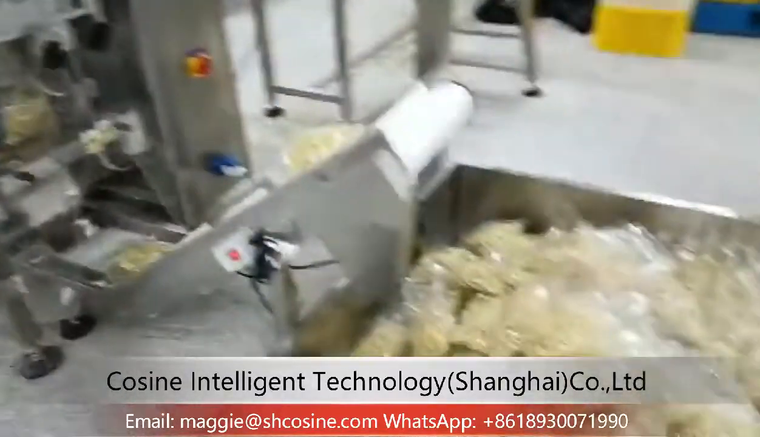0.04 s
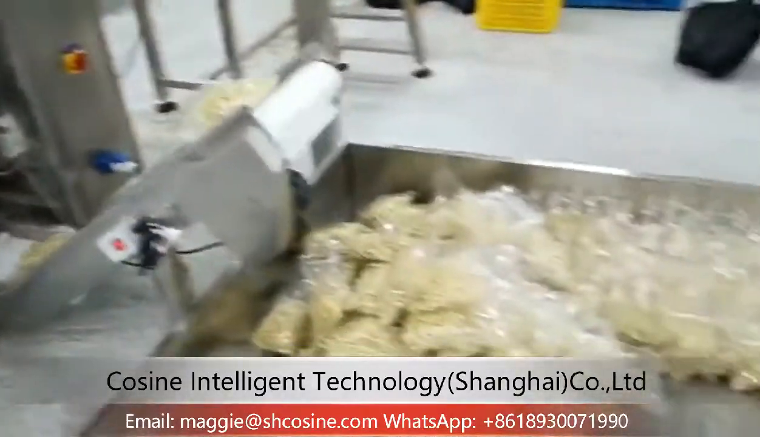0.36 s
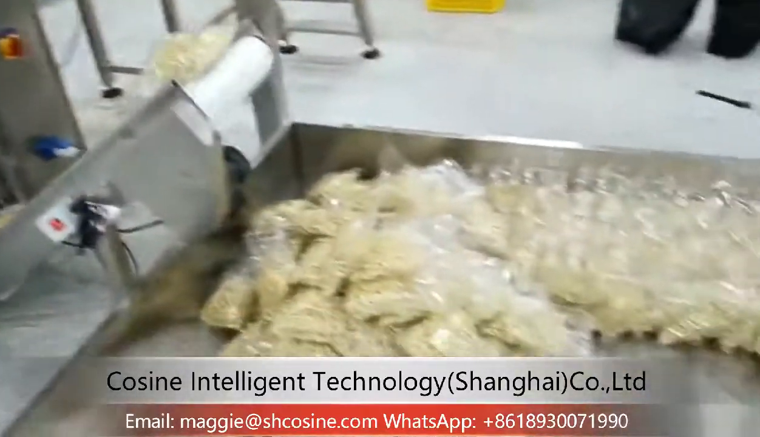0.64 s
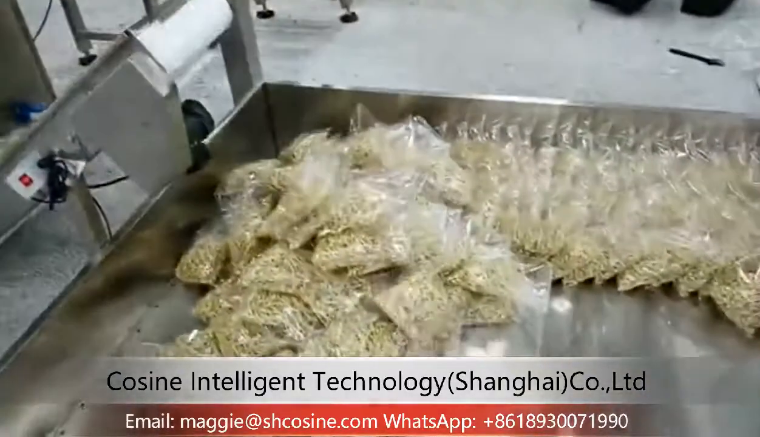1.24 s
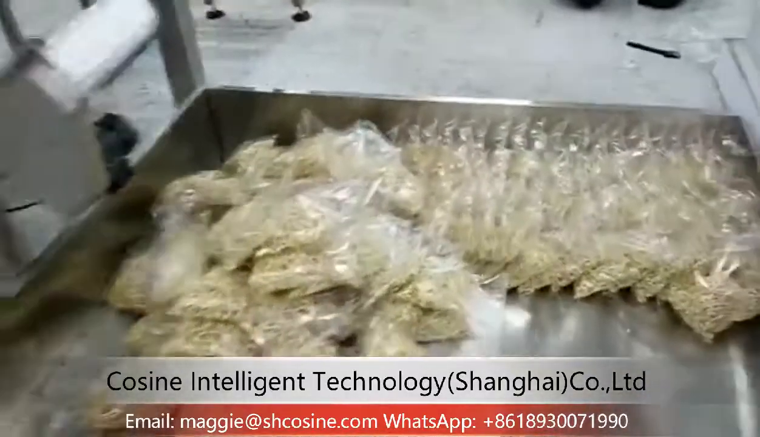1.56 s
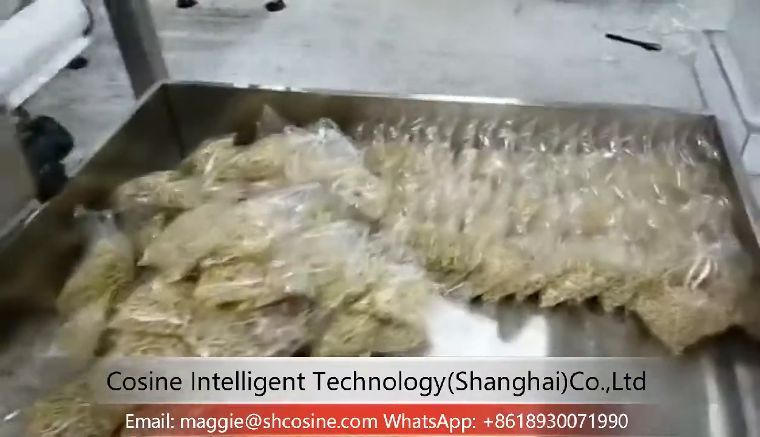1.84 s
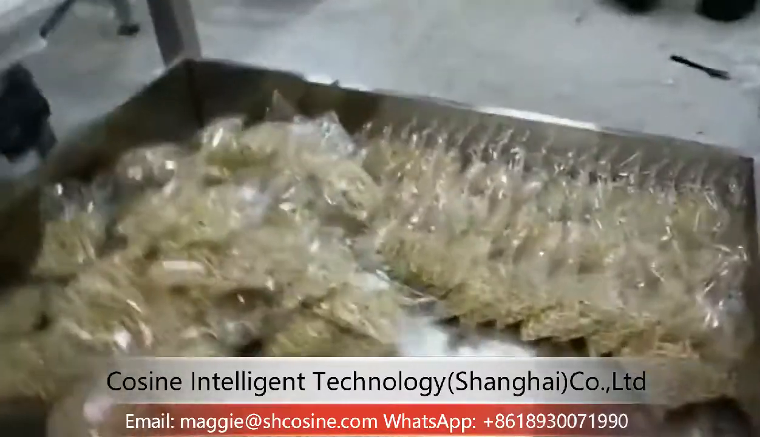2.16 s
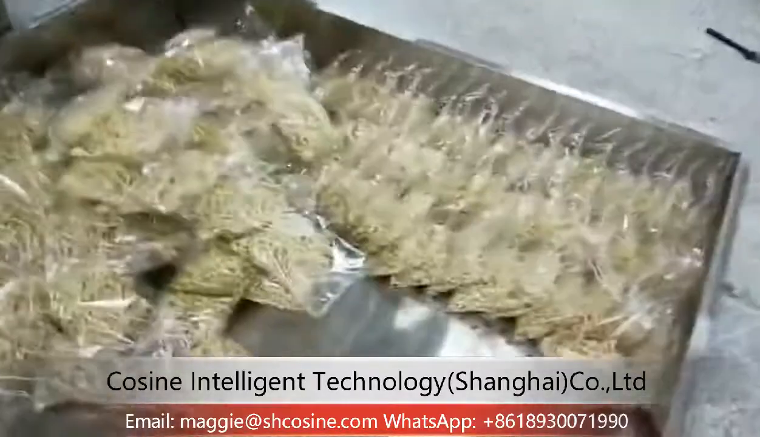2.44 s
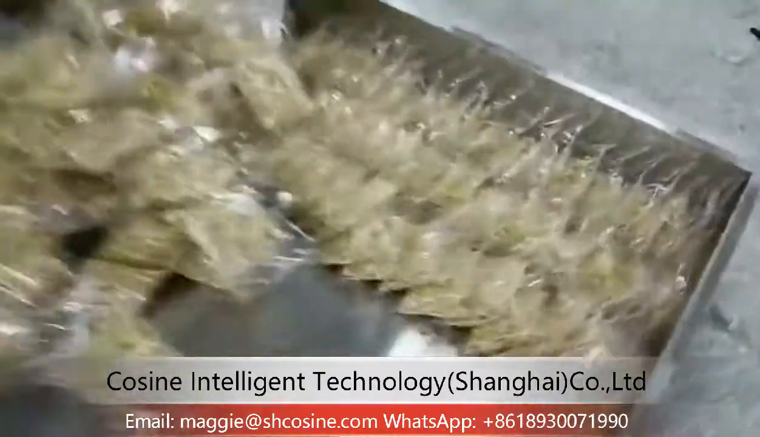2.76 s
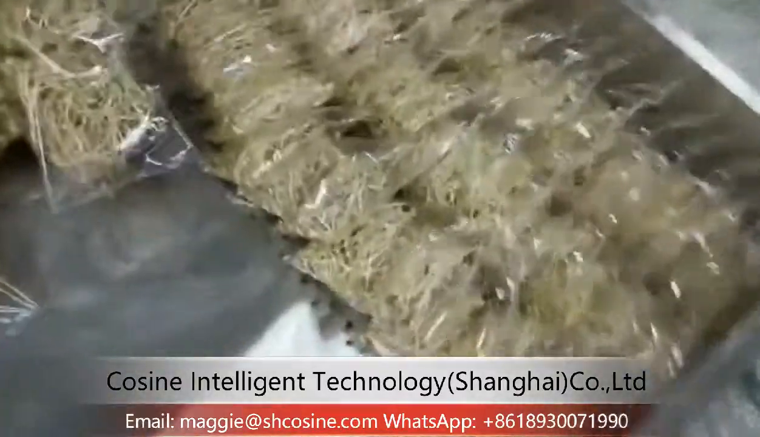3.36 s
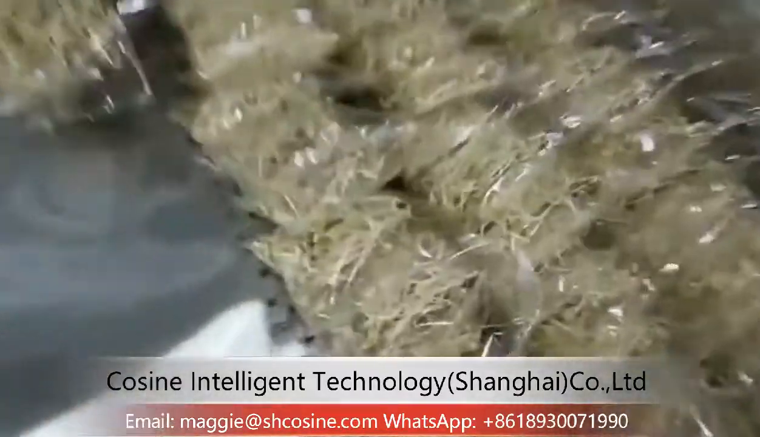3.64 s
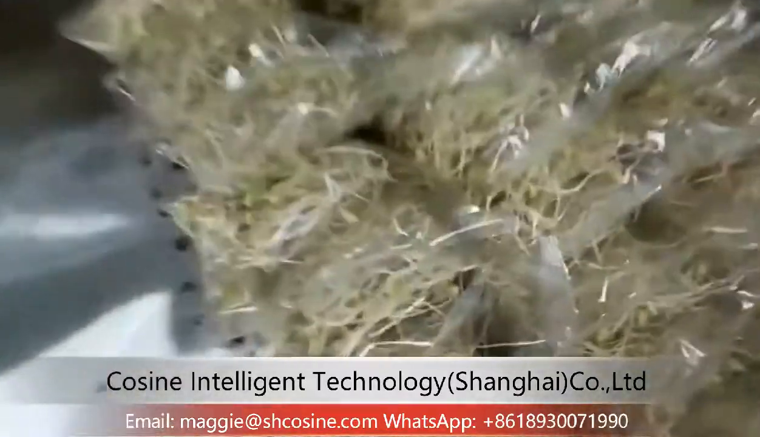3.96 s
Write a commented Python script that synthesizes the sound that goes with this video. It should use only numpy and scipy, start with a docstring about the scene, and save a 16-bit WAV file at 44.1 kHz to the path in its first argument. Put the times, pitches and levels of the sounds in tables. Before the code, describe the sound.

Over the steady din of a factory hall, a nearby packing machine thumps, then rustles, hisses and rattles with squeaking steel. It eases off, thumps into a second rattling rush, and a bag briefly swishes over steel.

```python
"""The steady din of a hard-walled factory hall and a thin drive whine, then a dull thump: a bag-packing
machine starts its cycle, and again about 2.4 s later. Each cycle swells into a rush of rustling film and
rattling steel while the frame rumbles under load. Loose sheets knock, air and film hiss, steel parts
squeak, squeal, scrape and clack, the drive hums briefly, and near the end a bag swishes over steel."""
import sys
import numpy as np
from scipy import signal
from scipy.fft import rfft, irfft
from scipy.io import wavfile

SR = 44100
rng = np.random.default_rng(int(sys.argv[2]) if len(sys.argv) > 2 else 0)


def wav_out(sig):
    """Save sig, one row per channel (or a flat mono array), as 16-bit PCM at SR to the path in sys.argv[1]."""
    wavfile.write(sys.argv[1], SR, np.round(np.clip(np.atleast_2d(sig).T, -1, 1) * 32767).astype(np.int16))


N = 176400
T = np.arange(N) / SR
ECHO_T = T[:SR // 10]
HZ = np.maximum(np.fft.rfftfreq(N, 1 / SR), 1)

# tone of the hall's din (frequency [Hz], relative level [dB])
DIN_EQ = [(25, -33.5), (80, -13), (160, 0.5), (340, -0.5), (700, -1.5), (1100, -8), (1550, -3.5),
          (2000, -1), (2900, 0.5), (3900, -5), (4800, -15.5), (5700, -9), (6300, -9.5), (6800, -7.5),
          (7500, -21.5)]
# the drive's hums (time [s], hold [s], pitch [Hz], level [dB])
DRIVE_HUMS = [(.41, 0.073, 332.5, -30.5), (2.313, 0.22, 344, -36.5), (2.356, 0.034, 344, -31),
              (2.94, .06, 420, -31.5), (3.552, 0.068, 405, -30)]
# swell of the drive's whine (time [s], level [dB])
WHINE_FADER = [(.07, -40), (.13, -31), (1.1, -38.5), (1.8, -38), (2.05, -45.5), (2.42, -39), (3.0, -35.5),
               (4, -46)]
# resonances of the whine (frequency [Hz], width [Hz], relative level [dB])
WHINE_RING = [(6256, 12, 0), (6380, 130, -4)]
# swells of the frame's rumble and deep shudder (time [s], relative level [dB])
RUMBLE_FADER = [(0.0, -38.5), (0.24, -35.5), (0.47, -29), (1.06, -33.5), (1.19, -28.5), (1.44, -38),
                (2.29, -46.5), (2.37, -35.5), (2.77, -33.5), (2.91, -28.5), (3.09, -29.5), (3.15, -25),
                (3.46, -35.5), (3.65, -31.5), (4.0, -39.5)]
SHUDDER_FADER = [(0, -49), (.3, -37), (.39, -27), (.78, -30), (.88, -39.5), (1.08, -29.5), (1.3, -32.5),
                 (1.5, -43.5), (2.3, -51), (2.5, -39), (2.74, -40), (2.8, -24.5), (3.05, -33.5),
                 (3.22, -24), (3.32, -35), (4, -39)]
# tone of the rumble and shudder (frequency [Hz], relative level [dB])
RUMBLE_EQ = [(120, -15), (260, -6.5), (340, -2), (430, -0.5), (540, 0), (720, -0.5), (900, -4),
             (1100, -11.5), (1800, -26)]
SHUDDER_EQ = [(20, -20), (40, -33.5), (70, -5), (95, -8.5), (130, -0.5), (165, -1), (200, 1.5), (260, -6.5),
              (400, -27)]
# knocks on loose steel sheets (time [s], relative level [dB])
SHEET_KNOCKS = [(.47, -29.5), (.55, -32), (.65, -32), (.76, -28.5), (2.87, -32), (3.16, -31), (3.21, -32.5)]
# modes of the sheets (frequency [Hz], relative level [dB])
SHEET_RING = [(340, -6), (402, -4.5), (615, -5.5), (692, -1.5), (850, -7.5), (1310, -2.5), (1455, -4.5)]
# thin squeals (time [s], hold [s], pitch [Hz], level [dB])
SQUEAL_CUES = [(.365, 0.059, 5860, -29), (.47, 0.12, 5860, -27.5), (0.707, 0.099, 5880, -31.5),
               (0.926, .06, 5800, -27), (1.081, 0.2, 5850, -31.5), (3.804, 0.023, 1379, -27)]
# scrapes, clacks and the bag's swish on steel (time [s], hold [s], level [dB])
SCRAPE_CUES = [(0.466, 0.21, -31), (0.934, 0.13, -19.5), (1.039, 0.038, -26.5), (1.117, 0.28, -33)]
CLACK_CUES = [(1.238, .027, -22), (3.114, .01, -15.5)]
SWISH_CUES = [(3.685, 0.05, -21)]
# the resonances each one excites (frequency [Hz], width [Hz], relative level [dB])
SCRAPE_RING = [(3875, 25, -9), (4812, 22, -11), (5880, 90, -3), (6340, 90, -1), (6700, 80, -4),
               (6957, 28, -2)]
CLACK_RING = [(3980, 260, -1), (4650, 250, -5), (5010, 150, -9.5), (5750, 250, -5)]
SWISH_RING = [(1660, 110, -6), (2084, 140, -0.5), (2600, 90, -8), (3040, 130, -4), (3930, 150, -2),
              (5300, 190, -3)]
# chattering squeaks (time [s], relative level [dB])
SQUEAK_CUES = [(.52, -17.5), (.592, -17.5), (0.704, -16), (0.75, -19), (.79, -18), (0.849, -21.5),
               (0.894, -20.5), (1.04, -20.5)]
# bursts of air and film (time [s], hold [s], level [dB])
HISS_CUES = [(.585, .056, -23.5), (.747, .038, -18), (0.939, .09, -24.5), (1.367, 0.033, -23.5),
             (1.746, .011, -28), (3.15, 0.035, -22)]
# tone of those bursts (frequency [Hz], relative level [dB])
HISS_EQ = [(500, -14.5), (1200, -5), (2200, 0), (3300, -3.5), (3950, 4), (4600, -8.5), (5400, -1),
           (6200, -3), (7400, -20)]
# the machine's dull blows (time [s], envelope peak [dB])
THUMP_CUES = [(0.3527, -6.5), (0.937, -29), (1.259, -20), (2.7636, -9.5), (3.133, -22), (3.478, -20),
              (3.672, -23.5)]
# swells of the rustling rush and its bright crinkle (time [s], relative level [dB])
RUSH_FADER = [(0.0, -32.5), (0.57, -19), (0.68, -21.5), (0.72, -22), (0.95, -23.5), (1.15, -20),
              (1.32, -25), (2.16, -37.5), (2.58, -31.5), (2.61, -26.5), (2.72, -29.5), (2.9, -23),
              (3.12, -23.5), (3.17, -21), (3.31, -27), (3.72, -25.5), (4.0, -31)]
CRINKLE_FADER = [(0.0, -52), (.33, -37.5), (0.56, -27.5), (0.69, -22.5), (0.76, -21), (0.92, -24.5),
                 (0.95, -22.5), (1.28, -27), (1.75, -36), (2.0, -48.5), (2.73, -41), (3.16, -21),
                 (3.33, -30.5), (3.7, -30.5), (4.0, -39)]
# tone of the rush and crinkle (frequency [Hz], relative level [dB])
RUSH_EQ = [(700, -38), (1100, -11), (1450, -7), (2450, -2), (3050, -0.5), (3450, -5), (3950, -12.5),
           (4500, -14.5), (6000, -23.5), (7500, -54.5)]
CRINKLE_EQ = [(2500, -17), (3600, -2.5), (4400, -2), (5000, 2), (5500, 6.5), (5900, 9), (6350, 5.5),
              (6750, 0), (7400, -42)]
# how alike the two sides are (frequency [Hz], likeness [0 is wide, 1 and above is mono])
STEREO_LIKENESS = [(60, 2), (130, 3.87), (250, 1), (470, 0.8), (930, 0.15), (1400, 0.1865), (2300, 0.16),
                   (6000, 0.03)]
# balance of the microphones (frequency [Hz], left minus right [dB])
MIC_BALANCE = [(300, 0), (800, -.5), (1450, -1.5), (2000, -5), (2600, -8), (3150, -11), (3800, -3.5),
               (4400, -2), (5100, 1.5), (5700, -2), (6300, -11), (7000, 1)]
# lag of the right microphone (frequency [Hz], phase [rad])
RIGHT_LAG = [(0, 0), (700, .05), (1380, 3), (1890, 3.6), (2410, 6.2), (5600, 17), (7490, 26)]


def from_db(db):
    """Decibels to gain."""
    return 10 ** (np.asarray(db) / 20)


def rms_one(x):
    """Scale to rms 1."""
    return x / np.sqrt(np.mean(x ** 2) + 1e-20)


def fader(points, trim_db=0):
    """Gain at every sample, riding a level curve."""
    return from_db(np.interp(T, *np.transpose(points)) + trim_db)


def over_hz(points):
    """A spectrum table at every frequency."""
    hz, value = np.transpose(points)
    return np.interp(np.log(HZ), np.log(hz), value)


def drift(rate_hz):
    """Smooth random wobble with a spread of about 1."""
    count = N // 20
    hz = np.fft.rfftfreq(count, N / SR / count)
    slow = irfft(rfft(rng.standard_normal(count)) / (1 + (hz / rate_hz) ** 2) * (hz > 2), count)
    return np.interp(T, np.linspace(0, N / SR, count), np.clip(rms_one(slow), -2, 2))


def spread(gain, source):
    """Colour two unrelated signals and blend them as mid and side into a stereo pair of rms 1."""
    mid, side = rfft(source) * gain
    alike = np.clip(over_hz(STEREO_LIKENESS), -.999, .999)
    return rms_one(irfft(np.sqrt(1 + alike) * mid + np.sqrt(1 - alike) * side * [[1], [-1]], N))


def noise_bed(eq, flicker_db, rate_hz, source=None):
    """Coloured stereo noise whose level flickers."""
    source = rng.standard_normal((2, N)) if source is None else source
    return spread(from_db(over_hz(eq)), source) * from_db(flicker_db * drift(rate_hz))


def ringing(modes):
    """Resonances kept ringing by rough contact; stereo, rms 1."""
    gain = sum(from_db(db) / (1 + ((HZ - hz) / width) ** 2) / np.sqrt(width) for hz, width, db in modes)
    return spread(gain, rng.standard_normal((2, N)))


def tone(hz, waver_hz):
    """A sine of rms 1 whose pitch wavers."""
    return np.sqrt(2) * np.sin(2 * np.pi * np.cumsum(hz + waver_hz * drift(36.7)) / SR)


def envelope(start, hold, db, attack_s, decay_s):
    """Rise to a level, stay until the hold ends, die away."""
    rise = np.clip((T - start) / attack_s, 0, 1)
    return from_db(db) * rise * np.exp(-np.maximum(T - start - hold, 0) / decay_s)


def bursts(cues, attack_s, decay_s):
    """One envelope for each cue, summed."""
    return sum(envelope(*cue, attack_s, decay_s) for cue in cues)


def hall_reverb(x, t60_s=0.97, predelay_s=.012):
    """Diffuse tail of the hall, about as strong as the sound that feeds it."""
    tail = spread(1, rng.standard_normal((2, N))) * from_db(-60 * T / t60_s) * (T > predelay_s)
    return signal.fftconvolve(x[None], tail / np.sqrt(np.sum(tail[0] ** 2)), axes=1)[:, :N]


def reflections(x, fading):
    """Dense fading echoes; their pattern shifts seven times a second as parts and listener move."""
    hop = SR // 7
    padded = np.pad(x * np.ones((2, 1)), [(0, 0), (hop, 2 * hop)])
    out = np.zeros((2, N + SR))
    for i in range(0, N + hop, hop):
        pattern = rng.standard_normal((2, len(fading))) * fading / np.linalg.norm(fading)
        grain = padded[:, i:i + 2 * hop] * signal.windows.cosine(2 * hop)
        echoes = signal.fftconvolve(grain, pattern, axes=1)
        out[:, i:i + echoes.shape[1]] += echoes
    return out[:, hop:hop + N]


def panels(x, send=0.55, fade_s=0.0049, low_cut_hz=600):
    """Reflections off nearby steel panels comb the mids and treble."""
    echoes = reflections(x, np.exp(-ECHO_T / fade_s))
    return x + send * irfft(rfft(echoes) / (1 + (low_cut_hz / HZ) ** 2), N)


def hall_din():
    """The factory's broad, fluttering noise floor, bounced off the panels."""
    bounced = panels(rng.standard_normal((2, N)))
    return from_db(-33.5) * noise_bed(DIN_EQ, flicker_db=2.7, rate_hz=10, source=bounced)


def drive():
    """The drive gives brief low hums and a thin whine that swells and sinks."""
    hum = sum(envelope(start, hold, db, attack_s=.025, decay_s=.025) * tone(hz, waver_hz=6)
              for start, hold, hz, db in DRIVE_HUMS)
    return hum + fader(WHINE_FADER) * ringing(WHINE_RING)


def frame():
    """The frame rumbles and shudders under load."""
    rumble = fader(RUMBLE_FADER) * noise_bed(RUMBLE_EQ, flicker_db=2, rate_hz=12)
    shudder = fader(SHUDDER_FADER, trim_db=0.5) * noise_bed(SHUDDER_EQ, flicker_db=0.24, rate_hz=5.2)
    return rumble + shudder


def sheet_knocks(t60_s=.28):
    """Loose sheets knock; each knock rings every mode with a strength of its own."""
    blows = np.zeros((len(SHEET_RING), N))
    for start, db in SHEET_KNOCKS:
        blows[:, int(start * SR)] = from_db(db) * rng.standard_normal(len(blows))
    rings = np.array([from_db(db - 60 * T / t60_s) * np.sin(2 * np.pi * hz * T) for hz, db in SHEET_RING])
    direct = signal.fftconvolve(blows, rings, axes=1).sum(axis=0)[:N]
    return direct + from_db(-5) * hall_reverb(direct)


def squeals(width_hz=17):
    """Steel rubbing under load sings on one narrow resonance at a time."""
    return sum(ringing([(hz, width_hz, 0)]) * envelope(start, hold, db, attack_s=0.0092, decay_s=0.038)
               for start, hold, hz, db in SQUEAL_CUES)


def scrapes():
    """Scraped steel rings high and bright."""
    return ringing(SCRAPE_RING) * bursts(SCRAPE_CUES, attack_s=0.0078, decay_s=0.057)


def clacks():
    """Brief steel contacts excite broad resonances that die fast."""
    return ringing(CLACK_RING) * bursts(CLACK_CUES, attack_s=.004, decay_s=.012)


def bag_swish():
    """A bag slides over steel and brushes its resonances."""
    return ringing(SWISH_RING) * bursts(SWISH_CUES, attack_s=0.0078, decay_s=0.057)


def squeaks(pitch_hz=3203, detune_hz=25, hold_s=.021):
    """A steel part on the right chatters in short rough squeaks on two beating pitches."""
    level = sum(envelope(start, hold_s, db, attack_s=.008, decay_s=.012) for start, db in SQUEAK_CUES)
    pair = rms_one(tone(pitch_hz - detune_hz, waver_hz=30) + tone(pitch_hz + detune_hz, waver_hz=30))
    roughness = from_db(drift(200) + 0.9)
    direct = level * pair * roughness
    pan = from_db([[-9], [-1]])
    return direct * pan + from_db(-14) * hall_reverb(direct)


def hisses():
    """Short broad bursts of air and film."""
    level = bursts(HISS_CUES, attack_s=0.0018, decay_s=0.016)
    return level * noise_bed(HISS_EQ, flicker_db=1, rate_hz=36)


def thumps(pitch_hz=184.3, peak_s=0.0079, sharpness=4.6):
    """Soft, heavily damped blows of about three oscillations, answered by the hall."""
    direct = np.zeros(N)
    for start, db in THUMP_CUES:
        age = np.maximum(T - start, 0)
        swell = (age / peak_s * np.exp(1 - age / peak_s)) ** sharpness
        direct -= from_db(db) * swell * np.sin(2 * np.pi * pitch_hz * age)
    return direct + from_db(-11.5) * hall_reverb(direct)


def rattle(clicks_per_s=1500, spread_db=0.5, click_share=0.49):
    """Dense tiny contacts and film crackles, smeared by nearby steel, on a bed of noise."""
    sizes = from_db(spread_db * np.minimum(rng.exponential(1, N), 3.5))
    clicks = (rng.random(N) < clicks_per_s / SR) * sizes * rng.choice([-1, 1], N)
    smear = np.exp(-ECHO_T / 0.0058) + .15 * np.exp(-ECHO_T / 0.032)
    crackle = rms_one(reflections(clicks, smear))
    return np.sqrt(click_share) * crackle + np.sqrt(1 - click_share) * rng.standard_normal((2, N))


def film_rush():
    """Film and rattling steel swell with each cycle, topped by a bright crinkle."""
    grains = panels(rattle())
    body = noise_bed(RUSH_EQ, flicker_db=.6, rate_hz=16, source=grains)
    crinkle = noise_bed(CRINKLE_EQ, flicker_db=1.27, rate_hz=24, source=grains)
    return fader(RUSH_FADER, trim_db=1.5) * body + fader(CRINKLE_FADER, trim_db=-0.5) * crinkle


def scene():
    """The machine over the din of the hall, in stereo."""
    din = hall_din()
    cycles = film_rush() + frame() + thumps()
    knocks = sheet_knocks() + sheet_knocks()  # two layers on the same cues
    accents = hisses() + squeaks() + squeals() + scrapes() + clacks() + bag_swish()
    return din + drive() + cycles + knocks + accents


def record(dry, ceiling=.95, cutoff_hz=7500):
    """The right microphone is brighter and hears the treble later; peaks are rounded, the top is cut."""
    balance = from_db(over_hz(MIC_BALANCE))
    lag = np.exp(-1j * np.interp(HZ, *np.transpose(RIGHT_LAG)))
    mics = np.array([balance, lag]) * np.sqrt(2 / (1 + balance ** 2))  # constant total power
    heard = irfft(rfft(dry) * mics, N)
    rounded = heard / (1 + (heard / ceiling) ** 4) ** .25
    low_pass = 1 / np.sqrt(1 + (HZ / cutoff_hz) ** 160)
    return irfft(rfft(rounded) * low_pass, N)


dry = scene()
out = record(dry)
wav_out(out)
```